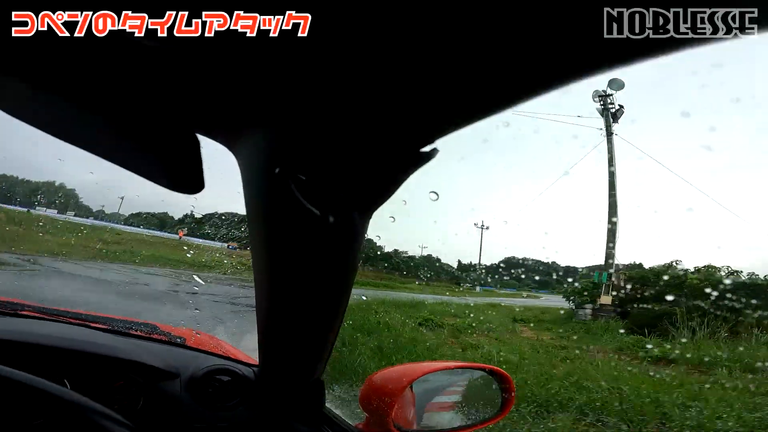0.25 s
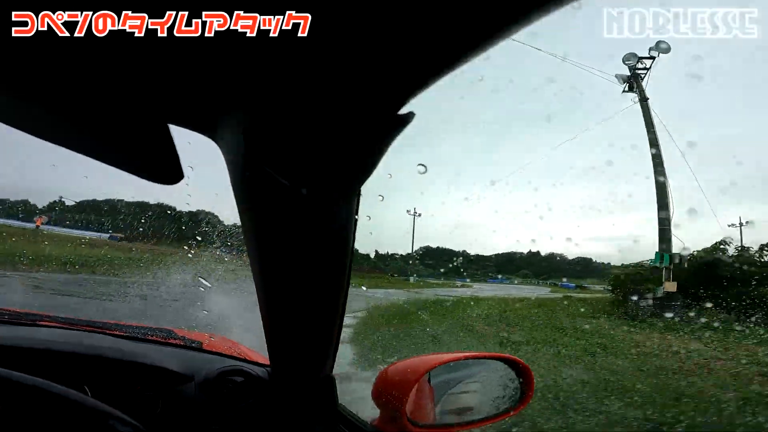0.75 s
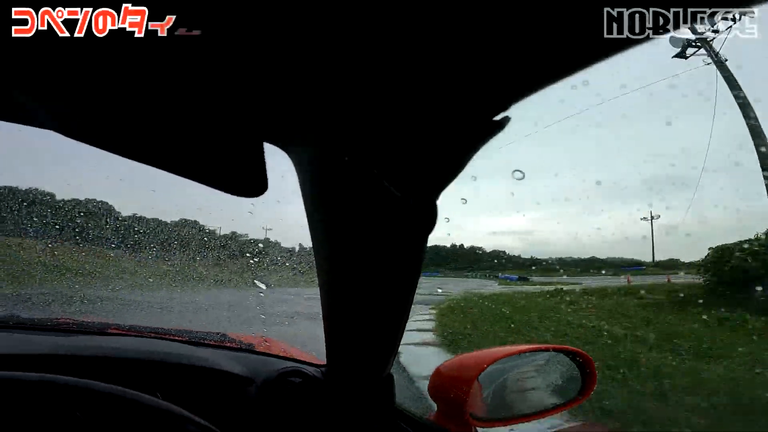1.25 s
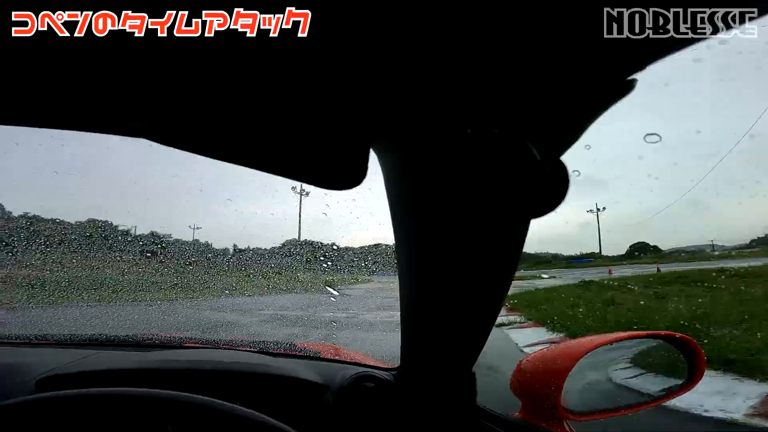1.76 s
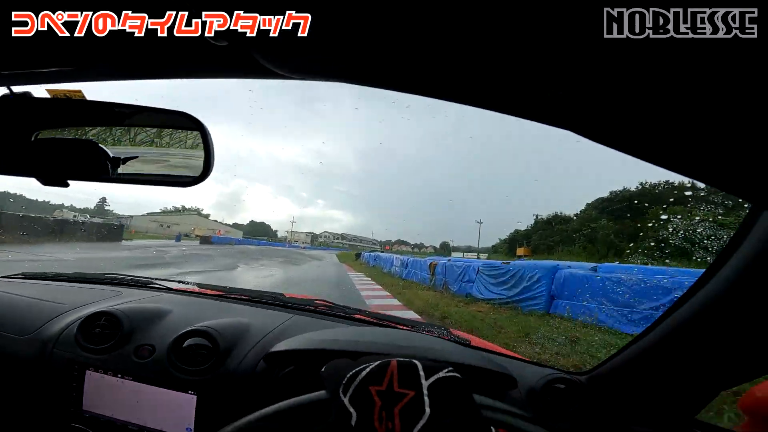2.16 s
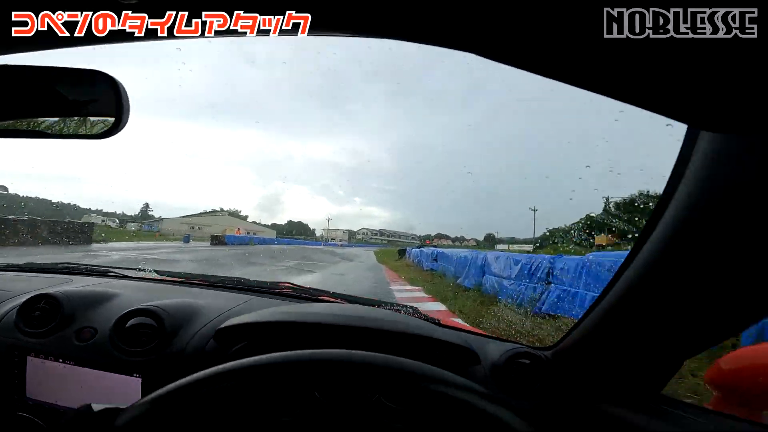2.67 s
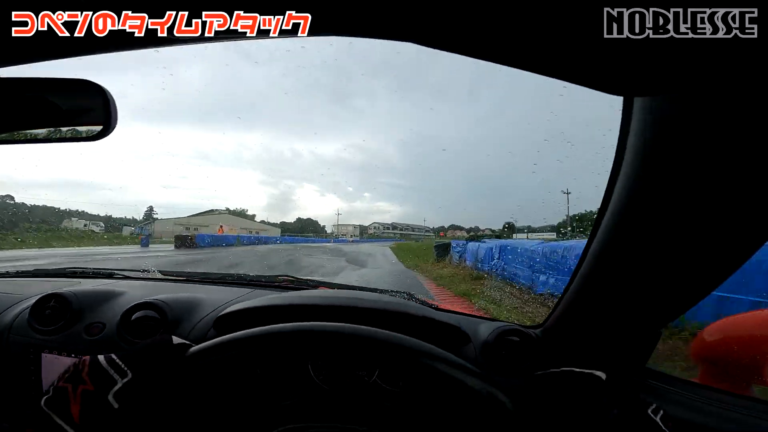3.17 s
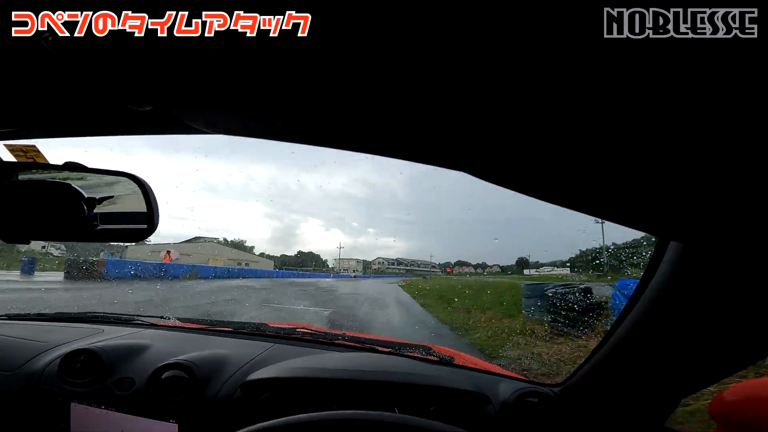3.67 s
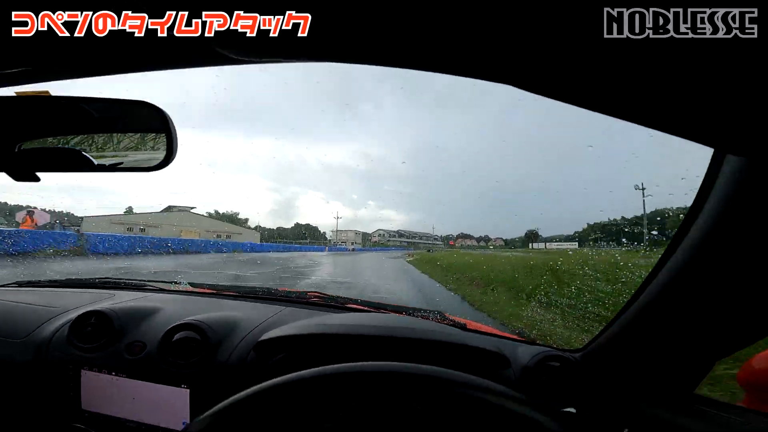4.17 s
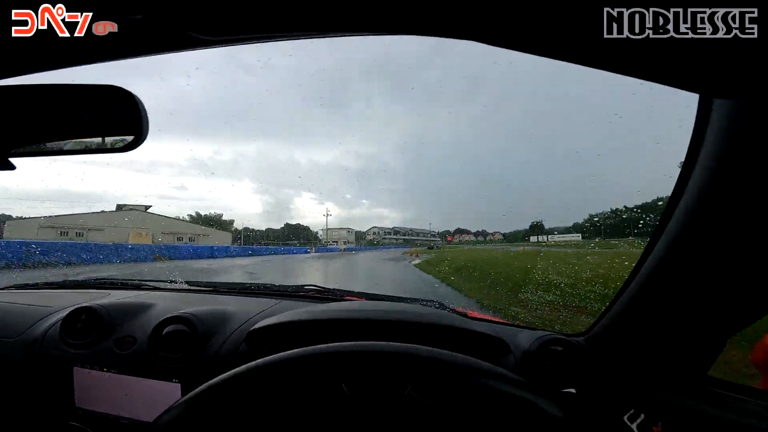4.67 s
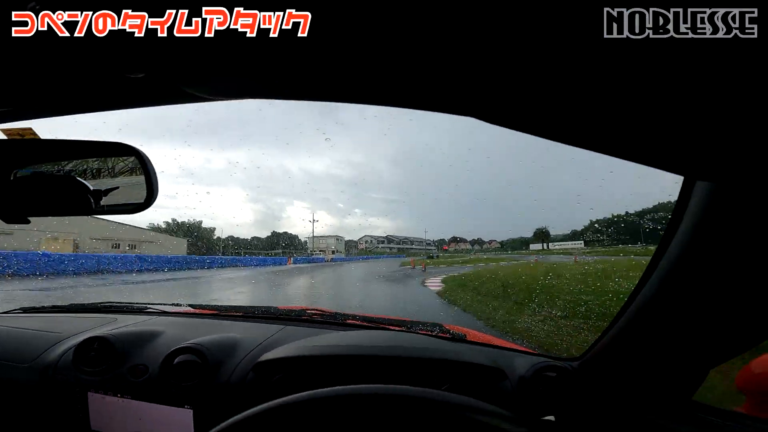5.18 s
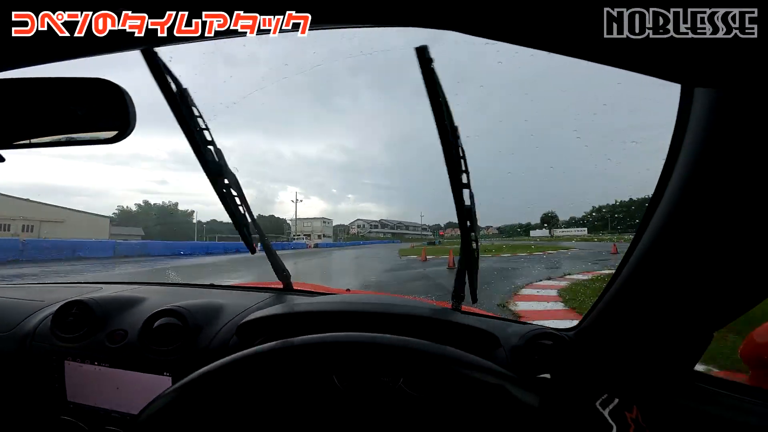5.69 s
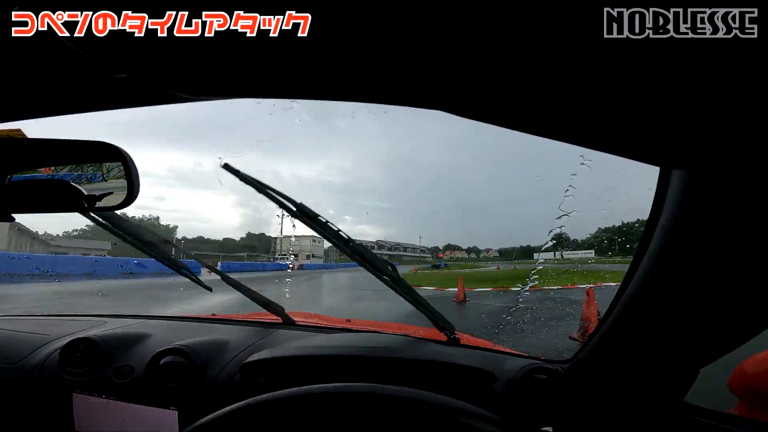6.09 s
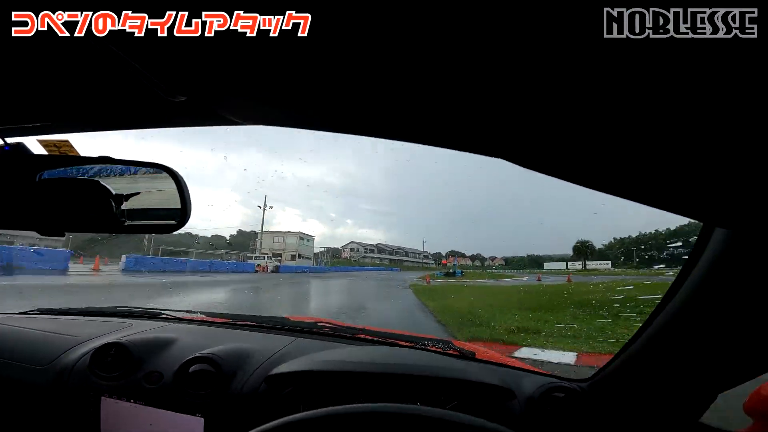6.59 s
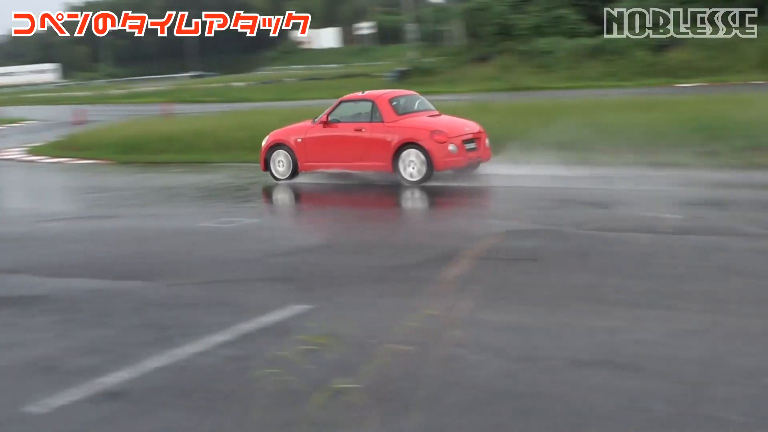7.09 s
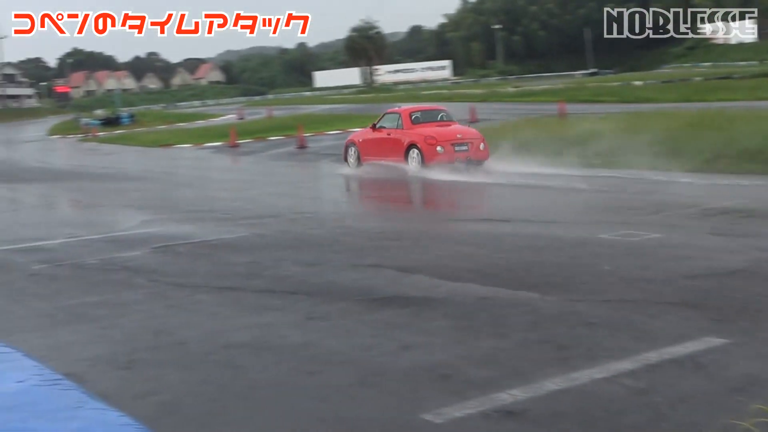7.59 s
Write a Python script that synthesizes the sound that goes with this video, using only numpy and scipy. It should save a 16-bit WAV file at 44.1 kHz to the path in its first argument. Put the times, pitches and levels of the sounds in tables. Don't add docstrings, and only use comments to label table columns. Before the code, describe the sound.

Close, boomy cabin sound: a low road rumble and droning body shell surround a rough four-cylinder engine. First comes a jolting corner with knocks and plastic rattles, then a sudden surge of engine noise that rises, sags and builds again towards high revs. Muffled water spray grows stronger, with small drops tapping glass and roof. Finally the throttle lifts, the pitch tumbles unevenly and metal parts clunk.

```python
import sys
import numpy as np
from scipy import signal
from scipy.fft import rfft, irfft
from scipy.io import wavfile
from scipy.ndimage import uniform_filter1d

SR = 44100
rng = np.random.default_rng(int(sys.argv[2]) if len(sys.argv) > 2 else 0)


def makeup_ratio(level_db):
    decades = np.asarray(level_db, float) / 20
    return 10 ** decades


def wav_out(sig):
    wavfile.write(sys.argv[1], SR, np.round(np.clip(np.atleast_2d(sig).T, -1, 1) * 32767).astype(np.int16))


N = 346185
TIME = np.arange(N) / SR
FREQ = np.fft.rfftfreq(N, 1 / SR) + 1e-3


def columns(table):
    s, *rest = np.transpose(table)
    return [np.interp(TIME, s, c) for c in rest]


def unit(x):
    return x / np.sqrt(np.mean(x ** 2))


def walk(rate_hz):
    k = int(SR / rate_hz)
    steps = np.repeat(rng.standard_normal(N // k + 1), k)
    return unit(uniform_filter1d(uniform_filter1d(steps, k), k)[:N])


def shaped(x, gain):
    return irfft(rfft(x) * gain, N)


def noise(gain):
    return shaped(rng.standard_normal(N), gain)


def colour(points):
    hz, db = np.transpose(points)
    return makeup_ratio(np.interp(np.log(FREQ), np.log(hz), db, left=-80, right=-80))


def resonance(hz, centre_hz, width_hz):
    return 1j * hz * width_hz / (centre_hz ** 2 - hz ** 2 + 1j * hz * width_hz)


def flickering(points, flicker_db, shared_db, rate_hz):
    out, gust, tone = 0, walk(rate_hz), colour(points)
    lowest_hz, highest_hz = points[0][0], points[-1][0]
    edges_hz = lowest_hz * np.sqrt(2) ** np.arange(2 * np.log2(highest_hz / lowest_hz))
    for low_hz in edges_hz:
        inside = (FREQ >= low_hz) * (FREQ < low_hz * np.sqrt(2))
        out = out + noise(tone * inside) * makeup_ratio(flicker_db * walk(rate_hz) + shared_db * gust)
    return unit(out)


def ring(start_s, level_db, pitch_hz, t60_s):
    age_s = np.clip(TIME - start_s, 0, None)
    decay = makeup_ratio(level_db - 60 * age_s / t60_s)
    onset = 1 - np.exp(-age_s * pitch_hz / 2)
    return decay * onset * np.sin(2 * np.pi * pitch_hz * age_s)


def bursts(start_s, level_db, decay_s):
    jumps = np.zeros(N)
    np.add.at(jumps, np.clip((start_s * SR).astype(int), 0, N - 1), makeup_ratio(level_db))
    return signal.lfilter([1], [1, -np.exp(-1 / (decay_s * SR))], jumps)


# centre_hz, width_hz, level_db
CABIN_MODES = [(110.9, 12, -3), (172, 27.6, 3.5), (214.2, 20, 1), (259.3, 19, -5.5), (311.3, 21.7, 1.5),
               (342.2, 14, -3), (400, 48, -1.5), (480, 51, -2), (575, 72, -5.5), (727, 120, -11.5),
               (850, 66, -15.5)]


def cabin(hz):
    return sum(makeup_ratio(level_db) * resonance(hz, centre_hz, width_hz) for centre_hz, width_hz, level_db in CABIN_MODES)


# firing_multiple, level_db
UNEVEN_ORDERS = [(.5, -1.5), (.75, -6.5), (1.25, -1), (1.5, -4.5), (2.25, -6.5), (2.5, -3), (2.75, -5.5),
                 (3, -5), (3.25, -15), (3.5, -8.5)]


def uneven_orders(turn, load_db):
    orders = 0
    for multiple, level_db in UNEVEN_ORDERS:
        level = makeup_ratio(level_db + 2.47 * walk(9))
        orders = orders + level * np.sin(multiple * turn + rng.uniform(0, 2 * np.pi) + 0.28 * walk(30))
    return shaped(makeup_ratio(load_db) * orders, cabin(FREQ))


# centre_hz, width_hz, level_db
DASH_MODE = (835, 45, -7)


def dash_panel(turn, load_db):
    centre_hz, width_hz, level_db = DASH_MODE
    return makeup_ratio(level_db) * shaped(makeup_ratio(load_db) * np.sin(4 * turn), resonance(FREQ, centre_hz, width_hz) ** 2)


# start_s, firing_hz, boom_db, load_db (other orders), whine_db, order_7_4_db, order_2_db
ENGINE_CORNER = [
    (0, 114.1, -38, -42, -68, -35, -37),
    (.4, 120.1, -33, -36, -71, -38, -42),
    (.9, 126.4, -35, -36.5, -71, -34, -41),
    (1.5, 134, -32, -38, -69, -40, -38.5),
    (1.93, 140, -34, -35, -68, -39, -32),
]
ENGINE_PULL = [(1.95, 163.6, -29.0, -33, -63.0, -38.0, -41.0),
               (2.05, 164.9, -25.0, -33, -66.0, -39.0, -40.0),
               (2.15, 166.4, -23.0, -33, -69.0, -39.0, -39.0),
               (2.25, 167.8, -23.0, -33, -65.0, -38.0, -38.0),
               (2.35, 169.9, -24.0, -33, -66.0, -30.0, -36.0),
               (2.45, 172.8, -24.0, -33, -59.0, -25.0, -35.0),
               (2.55, 175.5, -20.0, -33, -65.0, -26.0, -37.0),
               (2.65, 177.8, -18.0, -33, -63.0, -29.0, -40.0),
               (2.75, 180.1, -20.0, -33, -65.0, -32.0, -38.0),
               (2.85, 175.8, -20.0, -33, -64.0, -31.0, -38.0),
               (2.95, 167.8, -22.0, -33, -60.0, -38.0, -43.0),
               (3.05, 156.6, -25.0, -33, -62.0, -43.0, -36.0),
               (3.15, 156.5, -24.0, -33, -64.0, -42.0, -33.0),
               (3.25, 159.1, -22.0, -33, -61.0, -47.0, -35.0),
               (3.3, 160.3, -22.0, -33, -63.0, -45.0, -37.0),
               (3.45, 164.0, -19.0, -33, -64.0, -43.0, -38.0),
               (3.6, 167.6, -19.0, -33, -57.0, -43.0, -32.0),
               (3.75, 171.0, -22.0, -33, -64.0, -30.0, -35.0),
               (3.9, 174.3, -18.0, -33, -60.0, -24.0, -35.0),
               (4.05, 177.6, -17.0, -33, -62.0, -23.0, -37.0),
               (4.2, 181.0, -18.0, -33, -58.0, -24.0, -40.0),
               (4.35, 184.3, -21.0, -33, -62.0, -27.0, -39.0),
               (4.5, 187.5, -24.0, -33, -54.0, -28.0, -36.0),
               (4.65, 190.6, -29.0, -33, -61.0, -27.0, -32.0),
               (4.8, 193.7, -35.0, -33, -48.0, -26.0, -29.0),
               (4.95, 196.7, -26.0, -33, -44.0, -29.0, -27.0),
               (5.1, 199.8, -24.0, -33, -47.0, -34.0, -27.0),
               (5.25, 202.7, -21.0, -33, -57.0, -36.0, -27.0),
               (5.4, 205.6, -17.0, -33, -58.0, -41.0, -27.0),
               (5.55, 208.2, -16.0, -33, -52.0, -52.0, -29.0),
               (5.7, 210.8, -15.0, -33, -63.0, -41.0, -28.0),
               (5.85, 213.4, -16.0, -33, -56.0, -35.0, -28.0),
               (6.0, 216.2, -18.0, -33, -58.0, -32.0, -31.0),
               (6.15, 218.8, -15.0, -33, -60.0, -30.0, -34.0),
               (6.3, 221.4, -13.0, -33, -60.0, -32.0, -37.0),
               (6.45, 223.8, -12.0, -33, -58.0, -31.0, -31.0),
               (6.6, 226.4, -13.0, -33, -65.0, -29.0, -37.0),
               (6.75, 228.9, -16.0, -33, -54.0, -29.0, -36.0),
               (6.9, 231.3, -18.0, -33, -52.0, -29.0, -39.0),
               (7.05, 233.9, -20.0, -33, -62.0, -31.0, -37.0)]
ENGINE_LIFT = [(7.07, 233.3, -23, -33, -65, -37, -36), (7.114, 234.8, -17.5, -34.5, -64, -30, -32),
               (7.174, 250.2, -13.5, -36, -65, -34, -36), (7.184, 251.5, -21.5, -36, -62, -37, -34),
               (7.218, 215.9, -10, -39, -62, -34, -35), (7.294, 223.9, -26.5, -35.5, -61, -38, -38),
               (7.342, 224.3, -19.5, -36, -60, -37, -41), (7.448, 206.5, -24, -41, -65, -39, -34),
               (7.624, 199.7, -16.5, -36, -65, -30, -31), (7.644, 183.7, -47, -33, -65, -38, -46),
               (7.676, 170.5, -17.5, -32.5, -64, -40, -40), (7.77, 154.1, -31, -40, -67, -41, -41),
               (7.802, 165.4, -26, -39, -65, -42, -34), (7.85, 163, -44, -33.5, -65, -31, -32)]


def engine():
    firing_hz, boom_db, load_db, whine_db, seventh_db, second_db = columns(
        ENGINE_CORNER + ENGINE_PULL + ENGINE_LIFT)
    turn = 2 * np.pi * np.cumsum(firing_hz) / SR + 0.043 * walk(25)
    boom = makeup_ratio(boom_db + 0.7 * walk(30)) * np.sin(turn + 0.091 * walk(40))
    seventh = makeup_ratio(seventh_db + 1.1 * walk(25)) * np.sin(7 * turn / 4)
    second = makeup_ratio(second_db + 1.1 * walk(25)) * np.sin(2 * turn)
    gear_whine = makeup_ratio(whine_db + 1.5 * walk(20)) * np.sin(9.5 * turn)
    body = uneven_orders(turn, load_db) + dash_panel(turn, load_db)
    return np.sqrt(2) * (boom + seventh + second + body + gear_whine)


# start_s, rumble_db, pan_db, drone_db
ROAD_LEVELS = [(0.0, -32, -30.5, -26), (0.15, -34.0, -25.5, -26), (0.3, -30, -21, -23),
               (0.45, -37.0, -20.5, -22), (0.6, -36.0, -24, -22.5), (0.75, -34.0, -21, -17.5),
               (0.9, -35.0, -21.5, -23.0), (1.05, -31, -24, -23.0), (1.2, -31, -20.5, -18),
               (1.35, -36.0, -23.5, -25.0), (1.5, -35, -26.5, -24), (1.65, -36.0, -24.5, -28.5),
               (1.8, -36.0, -27, -22), (1.95, -35, -23.5, -26), (2.0, -40, -32, -26.0),
               (2.25, -40, -21.5, -24.5), (2.5, -33, -22, -22), (2.75, -38.0, -23, -24.5),
               (3.0, -39.5, -28, -25), (3.25, -41, -34.0, -27.5), (3.5, -38, -30.5, -26),
               (3.75, -39, -29, -21.5), (4.0, -39, -40.5, -23), (4.25, -43, -34.5, -25),
               (4.5, -37, -38, -23.5), (4.75, -41.0, -31.5, -21.5), (5.0, -36, -32.5, -23.5),
               (5.25, -40.5, -27.5, -24), (5.5, -38, -30, -22), (5.75, -39.5, -29, -25),
               (6.0, -36.5, -31.5, -21.5), (6.25, -35.5, -32, -24), (6.5, -40, -32.5, -24),
               (6.75, -43, -29.5, -23), (7.0, -39, -29, -22.5), (7.15, -42.0, -31.5, -18),
               (7.3, -36, -36, -20.5), (7.45, -41.0, -31, -25), (7.6, -38.0, -30, -16.5),
               (7.75, -39.5, -35, -23.0), (7.85, -43, -34, -25.5)]
# hz, db_per_hz
RUMBLE_SPECTRUM = [(22, -16.5), (32, -12), (45, 2), (65, -1.5), (90, -5.5)]
# centre_hz, width_hz
FLOOR_PAN_MODE = (113.8, 34.7)
# hz, db_per_hz
DRONE_SPECTRUM = [(90, -23), (150, 0.5), (250, 2), (400, -4), (600, -17), (1000, -26.5)]


def road():
    rumble_db, pan_db, drone_db = columns(ROAD_LEVELS)
    rumble = flickering(RUMBLE_SPECTRUM, flicker_db=1.3, shared_db=-0.1, rate_hz=9)
    pan = unit(noise(resonance(FREQ, *FLOOR_PAN_MODE) ** 2))
    shell = flickering(DRONE_SPECTRUM, flicker_db=1.95, shared_db=1.44, rate_hz=16)
    drone = unit(shaped(shell, cabin(FREQ) + 0.6))
    return makeup_ratio(rumble_db) * rumble + makeup_ratio(pan_db - 2.0) * pan + makeup_ratio(drone_db - 2.5) * drone


# start_s, level_db
KERB_LEVELS = [(0.0, -23), (0.148, -34.5), (0.206, -25.5), (0.936, -26), (1.02, -29), (1.046, -42),
               (1.094, -24), (1.164, -21), (1.566, -42), (1.704, -43), (1.746, -29), (1.862, -29),
               (1.9, -28)]
# centre_hz, width_hz
ARCH_MODE = (196.6, 60)


def kerb():
    [kerb_db] = columns(KERB_LEVELS + [(2.1, -59.5)])
    return makeup_ratio(kerb_db - 3) * unit(noise(resonance(FREQ, *ARCH_MODE) ** 2))


# start_s, peak_db, pitch_hz, t60_s
THUD_EVENTS = [(0.288, -9, 188, 0.13), (0.511, -13, 162, 0.12), (.646, -10, 300, 0.052),
               (0.66, -4, 400, 0.037), (.668, -24, 810, 0.059), (.67, -24, 700, 0.057),
               (.815, -8, 317, 0.088), (1.174, -9, 193, 0.13), (7.171, -15, 175, .4),
               (7.48, -17, 315, 0.23), (7.522, -7.5, 308.5, 0.3), (7.508, -30, 4000, 0.016),
               (7.513, -31, 3300, 0.018), (7.511, -30, 1350, 0.027)]


def thuds():
    return sum(ring(*thud) for thud in THUD_EVENTS)


# start_s, peak_db, upper_db (re lowest mode)
RATTLE_EVENTS = [(0.4619, -30.5, -7), (0.5152, -34, -8), (0.5626, -31, -7), (0.5844, -35, -4),
                 (0.6244, -38, 2), (0.7138, -37, -8), (0.7327, -35, -11), (0.8415, -37, -5),
                 (0.8709, -27.5, -2), (0.8949, -36, -10), (0.9388, -31, -8), (1.1109, -38, -5),
                 (1.1962, -32, 0), (1.2246, -35.5, -12)]
# pitch_hz, t60_s
TRIM_MODES = [(1378, 0.063), (2040, 0.057), (2283, .05)]


def trim_rattle():
    low, middle, top = TRIM_MODES
    trim = 0
    for start_s, peak_db, upper_db in RATTLE_EVENTS:
        trim = trim + ring(start_s, peak_db + 1.0, *low)
        trim = trim + ring(start_s, peak_db + upper_db + 1.5, *middle)
        trim = trim + ring(start_s, peak_db + upper_db - 11, *top)
    start_s, peak_db, _ = np.transpose(RATTLE_EVENTS)
    grit = unit(noise(resonance(FREQ, 2400, 3100) ** 2)) * bursts(start_s, peak_db - 9.5, decay_s=0.0085)
    return trim + grit


# start_s, spray_db, mist_db
WATER_LEVELS = [(0.0, -48, -77), (0.13, -45.4, -76.8), (0.26, -44.5, -71), (0.39, -42.5, -72),
                (0.52, -41, -68.8), (0.65, -40.5, -72), (0.78, -42, -69), (0.91, -41, -68.8),
                (1.04, -42, -73), (1.17, -39, -69), (1.3, -44.5, -73.2), (1.43, -45.7, -76),
                (1.56, -46, -78.3), (1.69, -45.5, -79), (1.82, -45.5, -77.3), (1.95, -45.5, -74),
                (2.08, -44.5, -74), (2.21, -44.4, -73), (2.34, -43.5, -73), (2.47, -42.5, -73),
                (2.6, -43.5, -71.5), (2.73, -42.5, -70), (2.86, -44, -71.5), (2.99, -41, -67.5),
                (3.12, -42.5, -71.5), (3.25, -42, -71), (3.38, -41.5, -70), (3.51, -41, -71),
                (3.64, -39.5, -72), (3.77, -40.5, -71), (3.9, -40.5, -71.5), (4.03, -41.5, -70.5),
                (4.16, -41.5, -70.5), (4.29, -40.5, -72.0), (4.42, -41, -70), (4.55, -41, -69.2),
                (4.68, -40.5, -70), (4.81, -41, -69.0), (4.94, -40.5, -70.3), (5.07, -39.5, -69),
                (5.2, -38.5, -67), (5.33, -38, -67), (5.46, -37.5, -68.5), (5.59, -37, -68.5),
                (5.72, -39.0, -67), (5.85, -37.5, -67.8), (5.98, -39, -65.5), (6.11, -38.5, -68),
                (6.24, -40, -66.5), (6.37, -38.5, -66), (6.5, -40, -69), (6.63, -40, -68), (6.76, -39, -68),
                (6.89, -38.5, -68), (7.02, -38.5, -67), (7.15, -37.5, -67.9), (7.28, -39.5, -68),
                (7.41, -39, -70), (7.54, -36.5, -65.3), (7.67, -39, -70), (7.8, -38.5, -65.9)]
# hz, db_per_hz
SPRAY_SPECTRUM = [(350, -30), (600, -3), (766, -9.5), (846, -6.5), (1040, -9.5), (1900, -12), (2300, -15.5),
                  (3700, -18.5), (7120, -40), (8500, -40.5), (11000, -73), (18700, -120)]
# hz, db_per_hz
MIST_SPECTRUM = [(4000, 8), (6000, 3.5), (8000, -2), (11000, 0), (12500, -14), (14000, -32)]


def spray():
    spray_db, mist_db = columns(WATER_LEVELS)
    hiss = flickering(SPRAY_SPECTRUM, flicker_db=0.83, shared_db=0.18, rate_hz=14)
    mist = flickering(MIST_SPECTRUM, flicker_db=-0.7, shared_db=0.8, rate_hz=14)
    chance = rng.random((500, 2))
    small = bursts(chance[:, 0] * N / SR, -3.6 * np.log(chance[:, 1]), decay_s=0.0046)
    drops = small * rng.standard_normal(N)
    patter = unit(shaped(drops, colour(MIST_SPECTRUM)))
    spatter = unit(shaped(small * rng.standard_normal(N), resonance(FREQ, 2600, 2300) ** 2))
    lower = makeup_ratio(spray_db) * (makeup_ratio(1.84) * hiss + makeup_ratio(-11.5) * spatter)
    upper = makeup_ratio(mist_db) * (makeup_ratio(13.5) * mist + makeup_ratio(0.5) * patter)
    return lower + upper


# start_s, peak_db, low_db (lower band re upper)
DROP_EVENTS = [(0.427, -47, 10.5), (0.5764, -43.5, 7), (0.734, -48.5, 6.5), (1.1178, -47.5, 6),
               (1.4334, -46, 5.5), (3.272, -44, 0.5), (3.3016, -38.5, 1), (3.465, -44.5, 0),
               (3.5454, -48.5, 3), (3.5813, -46, 6.5), (3.5925, -48, 4.5), (3.6451, -50.5, 8),
               (3.7986, -49, 4), (3.8585, -47, 4), (4.004, -45.5, 0), (4.1026, -43, 1.5), (4.161, -44.5, 3),
               (4.2603, -45, 5), (4.355, -45, 5), (4.466, -43, 4), (4.7853, -42, -1.5), (4.9684, -45, 2),
               (5.0275, -40.5, -3), (5.2437, -45, 2), (5.3652, -44.5, 4.5), (5.57, -46.5, 7),
               (5.7956, -42.5, 2.5), (6.0551, -43.5, 7.5), (6.1543, -42, 0), (6.311, -43.5, 4),
               (6.4065, -42, 2), (6.433, -45.5, 4), (6.6278, -43.5, 6), (6.99, -40.5, -0.5),
               (7.0738, -47, 2), (7.129, -42, 3.5), (7.174, -42, 3), (7.2045, -43, 5), (7.2995, -42.5, 5),
               (7.359, -49, 4), (7.3905, -46, 1), (7.4582, -44, 7), (7.49, -39.5, 7), (7.5125, -38, 5),
               (7.6395, -42, 6), (7.667, -38, 1)]


def big_drops():
    start_s, peak_db, low_db = np.transpose(DROP_EVENTS)
    tick = unit(noise(colour(MIST_SPECTRUM))) * bursts(start_s, peak_db - 1.5, decay_s=0.0035)
    tap = unit(noise(resonance(FREQ, 3300, 4000) ** 2)) * bursts(start_s, peak_db + low_db - 2, decay_s=0.004)
    return tick + tap


def scene():
    return (engine() + road() + kerb() + thuds() + trim_rattle() + spray() + big_drops())[None]


def top_cut(x):
    return signal.sosfilt(signal.butter(12, 14230, fs=SR, output="sos"), x)


# centre_hz, width_hz, depth (0-1)
HOUSING_NOTCHES = [(9160, 4000, 0.85), (12100, 520, .9)]


def record(dry):
    housing = 1
    for centre_hz, width_hz, depth in HOUSING_NOTCHES:
        housing = housing * (1 - depth * resonance(FREQ, centre_hz, width_hz))
    capsule = 1 / np.sqrt(1 + (FREQ / 13000) ** 40)
    mix = shaped(dry[0], housing * capsule)[None]
    return top_cut(mix)


dry = scene()
out = record(dry)
wav_out(out)
```